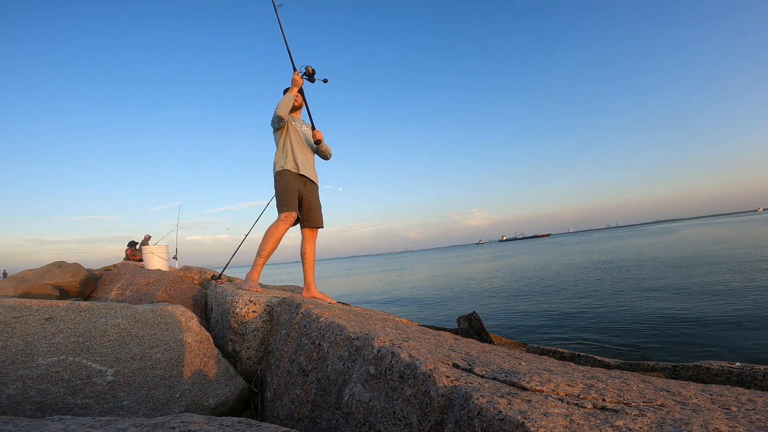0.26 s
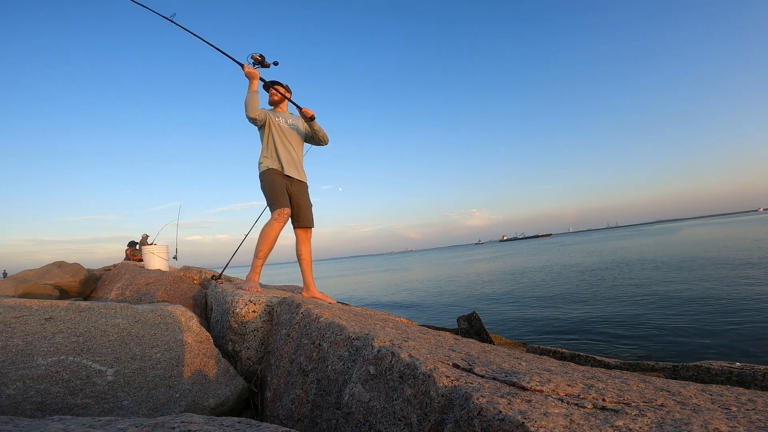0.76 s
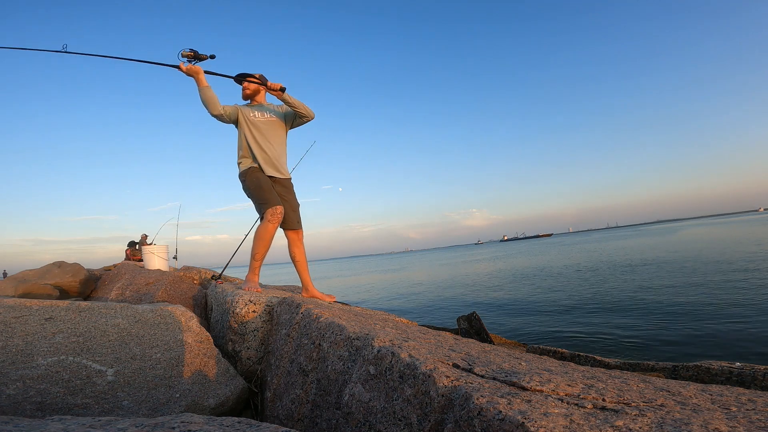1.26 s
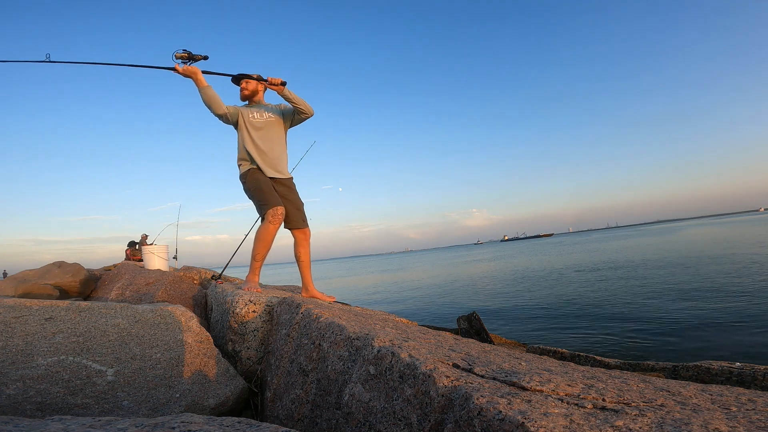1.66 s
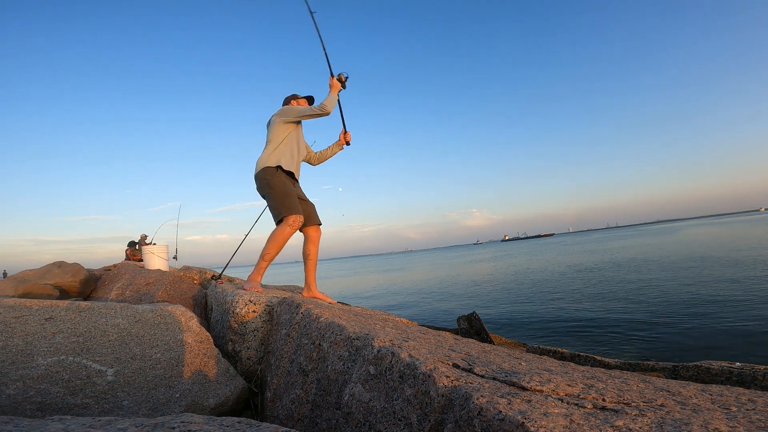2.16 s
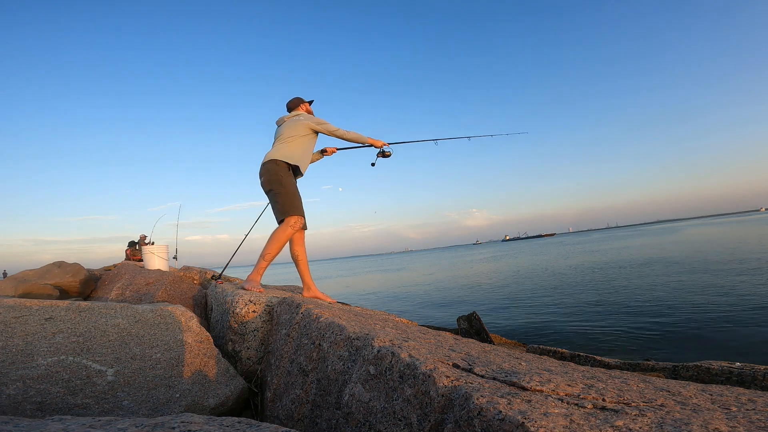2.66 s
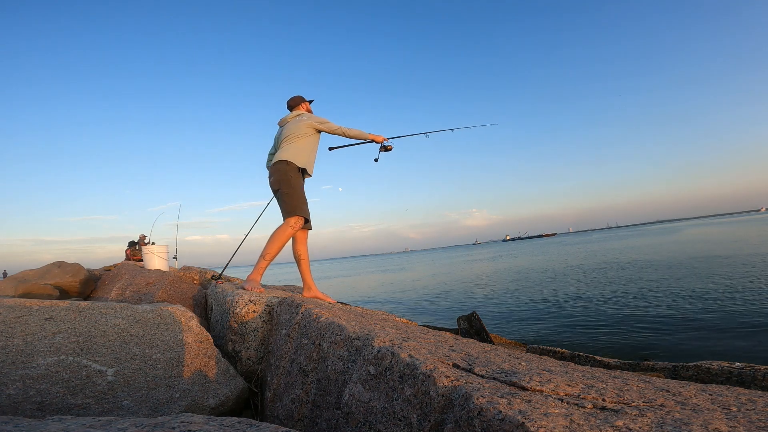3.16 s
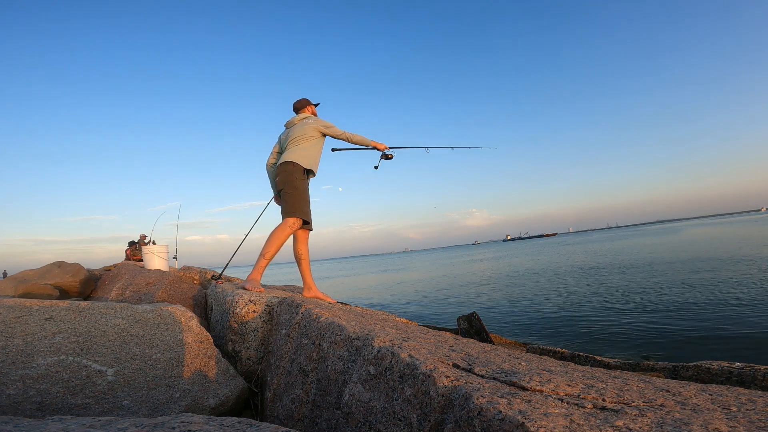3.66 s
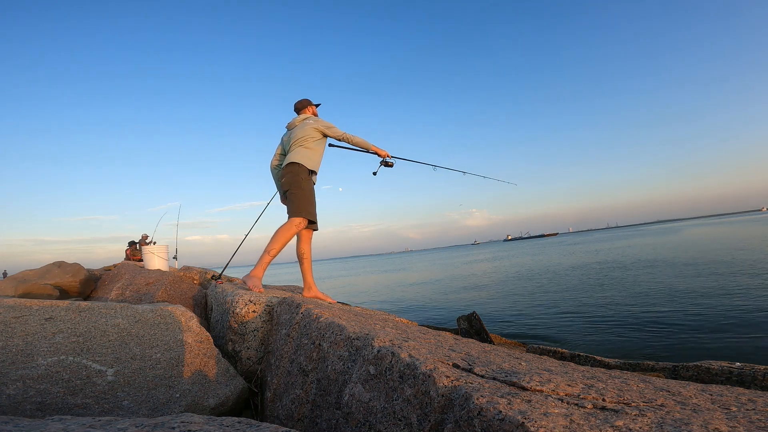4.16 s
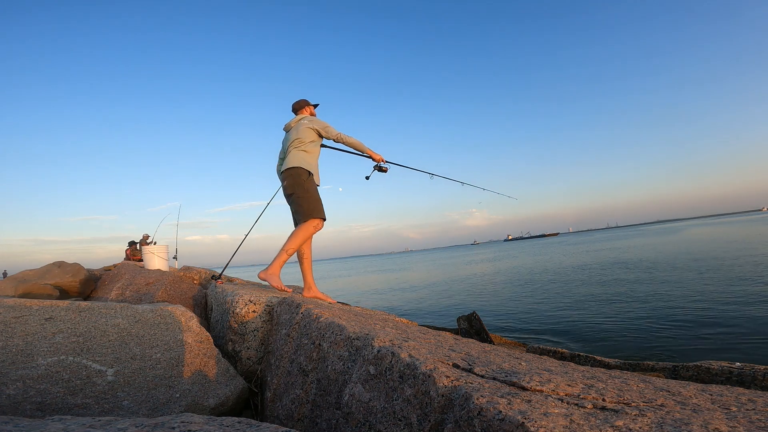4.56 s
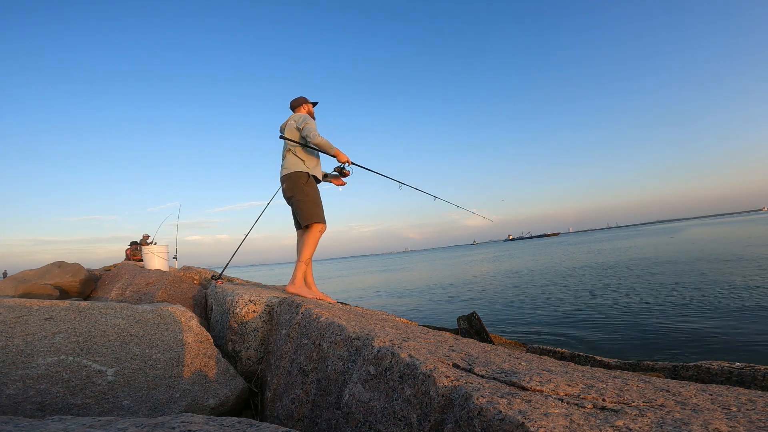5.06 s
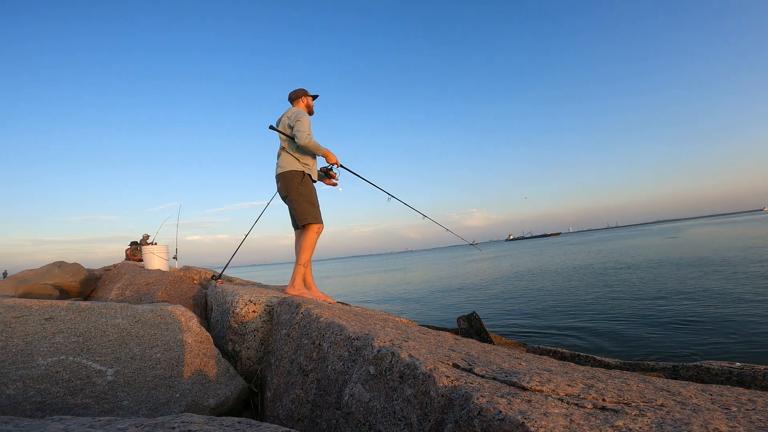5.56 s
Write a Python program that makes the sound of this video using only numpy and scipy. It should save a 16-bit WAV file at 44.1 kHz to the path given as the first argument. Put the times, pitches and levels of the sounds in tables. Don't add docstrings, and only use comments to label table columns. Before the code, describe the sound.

Outdoors by calm water, a quick whistling rod whoosh and hard clicks give way to thin, fading line hiss over deep droning.

```python
import sys
import numpy as np
from scipy import signal
from scipy.fft import rfft, irfft, next_fast_len
from scipy.io import wavfile
from scipy.ndimage import uniform_filter1d

SR = 44100
rng = np.random.default_rng(int(sys.argv[2]) if len(sys.argv) > 2 else 0)


def volts(x):
    e = np.asarray(x, float) / 20
    return 10 ** e


def dump(signal):
    limited = np.clip(np.atleast_2d(signal).T, -1, 1)
    pcm = np.round(limited * 32767).astype(np.int16)
    wavfile.write(sys.argv[1], SR, pcm)


N = 255780


def evened(x):
    return x / np.sqrt(np.mean(x ** 2) + 1e-20)


def read(points, hz):
    f, value = np.transpose(points)
    return np.interp(np.log(hz + 1), np.log(f + 1), value)


def play(rows):
    s, *columns = np.transpose(rows)
    t = np.arange(s[0], s[-1], 1 / SR)
    curves = [np.interp(t, s, column) for column in columns]
    return round(s[0] * SR), t, curves, signal.windows.tukey(len(t), 0.04)


def add(mix, at, sound, pan_db):
    part = mix[:, at:at + sound.shape[-1]]
    sides = volts(np.array([[pan_db / 2], [-pan_db / 2]]))
    part += (sound * sides)[:, :part.shape[1]]


def resonate(x, hz, width_hz):
    turn = np.exp(2j * np.pi * np.cumsum(hz * np.ones(len(x))) / SR)
    r = np.exp(-np.pi * width_hz / SR)
    low = x / turn + 1e-18
    for _ in range(2):
        low = signal.lfilter([1 - r], [1, -r], low)
    return evened((turn * low).real)


def flutter(length, ms, depth_db):
    size = max(int(ms * SR / 1000), 1)
    return volts(depth_db * evened(uniform_filter1d(rng.standard_normal(length), size)))


# t/s, air rush/dB, butt whoosh/dB, shaft whistle/dB, tip whistle/dB
ROD_SWEEP = [(2.26, -74.5, -57.5, -66, -75), (2.342, -54, -59, -73, -55.5), (2.392, -44.5, -47, -64.5, -63),
             (2.43, -31.5, -43, -40.5, -46), (2.444, -38.5, -44, -38, -32), (2.454, -45.5, -37, -38.5, -48),
             (2.502, -55.5, -57, -53, -60), (2.555, -48, -56, -53, -60)]
# f/Hz, density/dB per Hz
RUSH_SPECTRUM = [(290, -30.5), (500, -7.5), (833, -7), (982, -14.5), (1780, -23.5), (2180, -8.5),
                 (3000, -21), (6060, -22.5), (13500, -46)]
# t/s, butt f/Hz, shaft f/Hz, tip f/Hz
VORTEX_PITCH = [(2.27, 600, 2000, 3710), (2.33, 636, 2200, 4300), (2.38, 660, 2360, 5300),
                (2.42, 915, 2140, 6000), (2.46, 1095, 2490, 6000), (2.52, 1110, 2650, 6400),
                (2.58, 1100, 2620, 6400)]


def sweep():
    at, t, (rush_db, butt_db, shaft_db, tip_db), edge = play(ROD_SWEEP)
    s, *pitch = np.transpose(VORTEX_PITCH)
    butt_hz, shaft_hz, tip_hz = (np.interp(t, s, hz) for hz in pitch)
    n = len(t)
    air = rng.standard_normal((n, 5)).T
    stereo_air = air[0] + 0.55 * air[[3, 4]]
    colour = volts(read(RUSH_SPECTRUM, np.fft.rfftfreq(n, 1 / SR)))
    rush = evened(irfft(rfft(stereo_air) * colour, n))
    out = volts(rush_db + 1.5) * rush * flutter(n, ms=1.0, depth_db=1.5)
    out += volts(butt_db + 0.5) * resonate(air[1], butt_hz, 350)
    out += volts(shaft_db - 5.5) * resonate(air[2], shaft_hz, 280)
    out += volts(tip_db - 3.0) * resonate(air[3], tip_hz, 1500)
    return at, out * edge


def snap(modes):
    t = np.arange(2600) / SR
    contact = 0.3 * rng.standard_normal(len(t)) * volts(-60 * t / 0.0054)
    contact[4] += 1
    ring = sum(volts(db - 60 * t / t60_s) * np.sin(2 * np.pi * hz * t) for hz, db, t60_s in modes)
    swell = 1 - np.exp(-t / 0.0003)
    blow = signal.fftconvolve(contact, ring * swell)[:len(t)]
    return blow / abs(blow).max()


# t/s, peak/dB, left over right/dB
RELEASE_BLOWS = [
    (2.3141, -37.5, 0.96),
    (2.4146, -20, 0),
    (2.4166, -33, 1),
    (2.4308, -21.5, -0.14),
    (2.4322, -23, -0.48),
    (2.436, -30, 0),
    (2.4409, -20, .5),
    (2.4468, -37.5, 0),
]
# f/Hz, level/dB, t60/s
BLOW_MODES = [
    [(3800, -1, .016), (5660, -1, .01), (7020, -5, .008), (9860, -3, .006)],
    [(2310, -4.5, .02), (3960, 9.5, 0.011), (5300, -7, .008), (6400, 2.5, .01), (7800, -6, 0.011)],
    [(11660, -2.5, 0.008), (12550, -5, .008), (8060, -4, 0.0089)],
    [(2800, 3, 0.013), (3350, 8.5, 0.015), (4300, -6, 0.012), (7000, -10.5, .007)],
    [(2040, -0.5, .014), (2800, 7, 0.024), (4300, 7.5, 0.015)],
    [(3300, 0, 0.011), (5920, -2, .02)],
    [(6000, 8.5, 0.013), (6400, -7, .01), (3000, -6, .012)],
    [(6000, 0, .016), (2300, -2, .014)],
]


def release(tackle):
    for (s, db, pan_db), modes in zip(RELEASE_BLOWS, BLOW_MODES):
        add(tackle, round(s * SR), volts(db) * snap(modes), pan_db)


# t/s, hiss/dB, rim sizzle/dB, guide rattle/dB, first guide ring/dB
LINE_RUN = [(2.46, -48, -70, -53, -61), (2.48, -53.5, -58, -50.5, -67), (2.52, -57, -70, -67, -74),
            (2.54, -61, -64, -70, -71), (2.56, -57.5, -62, -51, -59), (2.63, -56.5, -65, -60, -72),
            (2.67, -55.5, -64, -55.5, -57), (2.73, -57.5, -61, -56.5, -65), (2.79, -59.5, -63, -54, -59),
            (2.82, -57, -63, -58, -70), (3.01, -60.5, -63, -60.5, -61), (3.13, -60, -68, -61.5, -74),
            (3.67, -61.5, -83, -64.5, -80), (3.98, -64.5, -88.5, -72, -88), (4.19, -65, -89.5, -63, -75),
            (4.25, -66, -88, -72, -85), (4.39, -64.5, -91.5, -67, -80), (4.49, -64, -90, -75, -82),
            (4.51, -63, -74, -64, -77), (4.6, -65.5, -92.5, -70, -79), (4.64, -65, -89, -58, -71),
            (4.68, -64, -91, -75, -77), (4.73, -65, -89, -67, -79), (4.78, -65, -87, -75, -90),
            (4.85, -65, -89.5, -70, -79), (4.88, -68, -91, -74, -82), (4.92, -62.5, -64.5, -58, -71),
            (4.93, -68.5, -79, -59, -72), (4.98, -74.5, -93, -73, -79)]
# t/s, f/Hz
HISS_PITCH = [(2.46, 6430), (3.0, 7070), (3.6, 7030), (4.2, 6000), (4.98, 5560)]
# f/Hz, width/Hz, level/dB
GUIDE_MODES = [(4293, 260, -3.5), (3300, 970, -7.5), (4020, 920, 2), (6344, 200, -9)]
# f/Hz, width/Hz, level/dB
RIM_MODES = [(11780, 1300, -2), (10800, 2700, 1.5), (12640, 1200, -10)]


def line():
    at, t, (hiss_db, rim_db, rattle_db, ring_db), edge = play(LINE_RUN)
    n = len(t)
    centre_hz = np.interp(t, *np.transpose(HISS_PITCH))
    air, chance = rng.standard_normal((n, 7)).T, rng.random((n, 3)).T
    slap_now = chance[0] < 300 / SR
    slaps = evened(slap_now * volts(-3.0 * np.log(chance[1] + 1e-3)) * np.sign(air[0]))
    drive = slaps + 1.5 * air[1]
    rattle = evened(sum(volts(db) * resonate(drive * flutter(n, 18, 4.5), hz, width_hz)
                        for hz, width_hz, db in GUIDE_MODES))
    ring = resonate(air[6] * flutter(n, 10.5, 6.5), 3680, 220)
    hiss = np.array([resonate(air[2] + 0.44 * air[k] + 0.3 * slaps, centre_hz, 3000) for k in (4, 5)])
    rim = np.array([sum(volts(db) * resonate(air[3] + 1.1 * air[k], hz, width_hz)
                        for hz, width_hz, db in RIM_MODES) for k in (4, 5)])
    out = volts(hiss_db - 0.9) * hiss * flutter(n, 30.0, 0.7)
    out += volts(rattle_db - 3.5) * rattle
    out += volts(ring_db - 1.0) * ring
    out += volts(rim_db - 0.3) * evened(rim) * flutter(n, 4.0, 1.4) * flutter(n, 40, 1.3)
    return at, out * edge


def tick(hz, bright_db):
    t = np.arange(500) / SR
    air = rng.standard_normal((2, len(t)))
    body = resonate(air[0], hz, 1500) * volts(-60 * t / 0.009)
    crack = resonate(air[1], 6300, 2400) * volts(bright_db + 5 - 60 * t / 0.0066)
    hit = (body + crack) * (1 - np.exp(-t / 0.0003))
    return hit / abs(hit).max()


# t/s, peak/dB, f/Hz, bright share/dB, left over right/dB
TACKLE_TICKS = [(0.0882, -50.5, 2650, -8, -4), (0.1244, -59.5, 2680, -16, -5),
                (1.1623, -60, 2780, -10.5, 3), (1.28, -55, 2850, -10, 0.0), (1.6721, -45, 2870, -8, 4.5),
                (2.5546, -37, 3090, -16, -4), (2.5704, -39.5, 3628, -12, -0.5),
                (2.5885, -40, 4320, -14, -7), (2.6124, -42, 2610, -10, -2), (2.6514, -42, 3580, -15, 0.0),
                (2.6683, -43, 2600, -20, 3.5), (2.6689, -40, 2600, -18, -0.5),
                (2.6744, -41.5, 3320, -15, -0.5), (2.6814, -40.5, 3680, -15, -5),
                (2.7094, -46, 2640, -9, 0.0), (2.928, -50.5, 4410, -12.5, 0.0),
                (2.9444, -44, 4370, -19, 0.5), (3.0094, -49, 3598, -15, -4), (3.0614, -46, 3420, -12, 0.5),
                (3.084, -45, 4240, -9, 0.0), (3.2094, -54, 2690, -10, -0.5), (3.3594, -46, 2740, -11, -1),
                (3.4344, -43, 2780, -14, -0.5), (3.4544, -42.5, 4260, -10, -0.5),
                (3.488, -51, 2650, -11, -6), (3.5466, -49, 2840, -9, -6), (3.5754, -41, 3000, -10, -2),
                (3.5813, -44, 2780, -10, -9), (3.6394, -49, 5110, -12, -6.5), (3.7344, -47, 4264, -15, 2),
                (4.0594, -53, 2840, -9, -2.0), (4.1194, -51, 2630, -14, -1.0),
                (4.1884, -48, 2700, -12.5, -1.5), (4.3844, -48.5, 4430, -9, 1),
                (4.5002, -54, 4299, -12, -1.0), (4.5644, -48, 3430, -14, -2.0),
                (4.6409, -46.5, 2710, -16, 0), (4.6633, -49, 4990, -13, -4), (4.7074, -53, 2780, -10, -2),
                (4.7277, -52, 4307, -14, -1.5), (4.7844, -56, 2820, -7, -1.5),
                (4.8958, -49, 4980, -5.5, -2), (4.9137, -43.5, 4300, -16, -9),
                (5.6794, -55, 2800, -21, -5.5)]


def ticks(tackle):
    for s, db, hz, bright_db, pan_db in TACKLE_TICKS:
        add(tackle, round(s * SR), volts(db) * tick(hz, bright_db), pan_db)


# f/Hz, left lead/rad
ANGLER_LEAD = [(0, 0), (3010, -0.64), (5340, -0.27), (6800, -0.1), (8440, -0.8), (9730, 0.0), (13200, 0.0)]


def near_ports(x):
    size = next_fast_len(N)
    lead = read(ANGLER_LEAD, np.fft.rfftfreq(size, 1 / SR))
    turn = np.exp(0.5j * np.outer([1, -1], lead))
    return irfft(rfft(x, size) * turn, size)[:, :N]


def stone(tackle):
    scatter = rng.standard_normal((2, 1300)) * volts(-60 * np.arange(1300) / SR / 0.01)
    scatter[:, :60] = 0
    return signal.fftconvolve(tackle, scatter / np.linalg.norm(scatter[0]), axes=1)[:, :N]


def bird(length_s, start_hz, end_hz):
    n = round(length_s * SR)
    glide_hz = np.linspace(start_hz, end_hz, n)
    return resonate(rng.standard_normal(n), glide_hz, 140) * signal.windows.tukey(n, 0.6)


# t/s, length/s, start f/Hz, end f/Hz, level/dB
BIRD_NOTES = [
    (0, 0.16, 2020, 2000, -61),
    (.39, .05, 3500, 3500, -68),
    (.48, .04, 3450, 3450, -70),
    (1.24, .05, 3800, 3800, -74),
    (1.336, 0.025, 1450, 1327, -53),
    (1.577, 0.1, 2230, 2200, -61),
    (1.949, 0.047, 2600, 2600, -61.5),
    (5.67, 0.034, 4260, 4300, -76),
]


def birds(tackle):
    for s, length_s, start_hz, end_hz, db in BIRD_NOTES:
        add(tackle, round(s * SR), volts(db) * bird(length_s, start_hz, end_hz), -0.4)


# t/s, lowest f/Hz, lowest/dB, second/dB, fourth order/dB
ENGINE_THROB = [(0.0, 62.52, -26.5, -27, -29), (0.11, 70.69, -18.5, -26, -37),
                (0.32, 70.45, -24.5, -24, -37), (0.4, 71.0, -20, -40, -48), (0.52, 73.78, -38, -28.5, -40),
                (0.63, 71.9, -16.5, -25, -35), (0.71, 69.9, -26, -38.5, -36),
                (0.89, 71.92, -19.5, -23.5, -33), (0.93, 70.9, -17, -26.5, -42),
                (1.06, 75.21, -29.5, -32.5, -32.5), (1.13, 72.8, -28, -22, -39),
                (1.19, 70.27, -21, -38, -46), (1.24, 69.8, -28, -27, -33.5), (1.4, 70.46, -21, -27, -45),
                (1.5, 74.7, -27, -30.5, -51), (1.65, 70.76, -24.5, -23, -32.5),
                (1.82, 71.08, -23, -37.5, -51), (1.86, 70.86, -23, -36.5, -33.5),
                (2.0, 68.44, -26.5, -21, -43.5), (2.05, 70.4, -25.5, -24, -50), (2.13, 70, -24, -47, -37),
                (2.23, 69.43, -20, -22.5, -40.5), (2.39, 68.89, -35, -29.5, -47),
                (2.45, 69.33, -24, -34, -39), (2.52, 68.98, -39, -41, -43), (2.57, 69.21, -25, -21, -34.5),
                (2.65, 69.4, -26, -38, -42), (2.7, 69.8, -26, -22.5, -36), (2.81, 69.5, -22, -30, -45),
                (2.86, 68.9, -38, -19.5, -59), (2.97, 70.4, -31, -35, -33),
                (3.13, 70.45, -24.5, -17, -39.5), (3.25, 71.04, -20.5, -43, -53),
                (3.31, 70.52, -25, -25.5, -34), (3.55, 64.2, -28.5, -27.5, -35),
                (3.62, 68.3, -19, -38, -35), (3.68, 69.5, -17.5, -20, -42), (3.93, 69.5, -37, -31, -36),
                (4.15, 69.44, -22.5, -22.5, -40), (4.22, 69.4, -18.5, -38, -48),
                (4.31, 69.66, -24.5, -26, -38.5), (4.57, 70.5, -24.5, -23.5, -37),
                (4.64, 70.64, -17, -28, -33.5), (4.72, 71.1, -25.5, -31, -39),
                (4.86, 71.1, -21.5, -22.5, -50), (4.93, 75.66, -44, -30, -50), (4.97, 73.3, -24, -33, -53),
                (5.06, 71.97, -24, -28.5, -46.5), (5.25, 71.85, -22, -27.5, -38),
                (5.3, 72.7, -20, -35, -45), (5.38, 74.5, -32, -21.5, -33), (5.54, 70.5, -21, -34, -41),
                (5.59, 69.8, -33.5, -29, -37.5), (5.67, 68.3, -17.5, -25.5, -35.5),
                (5.74, 69.2, -19.5, -39, -44), (5.8, 71.2, -30, -33, -38)]
# f/Hz, level/dB
AUX_MOTOR = (362.5, -48)


def throb():
    at, t, (low_hz, low_db, second_db, fourth_db), edge = play(ENGINE_THROB)
    motor_hz, motor_db = AUX_MOTOR
    drift = evened(uniform_filter1d(rng.standard_normal((len(t), 4)), 3500, 0)).T
    steady = np.ones(len(t))
    pitch_hz = np.array([low_hz, 88 * steady, 176 * steady, motor_hz * steady])
    pitch_hz *= 1 + np.array([[0.05], [0.05], [0.03], [0.004]]) * drift
    level_db = np.array([low_db - 1.0, second_db - 1.0, fourth_db - 1.2, motor_db + 1.2 * drift[0]])
    phase = 2 * np.pi * np.cumsum(pitch_hz, axis=1) / SR + 0.76
    tones = np.sqrt(2) * (volts(level_db) * np.sin(phase)).sum(0)
    return np.pad(tones, (at, N))[:N]


# f/Hz, width/Hz, level/dB
ENGINE_DRONE = [(115.7, 7, -34), (134.25, 8, -36), (176.1, 15, -44), (252.9, 25, -44.5), (360.8, 8, -51.5),
                (455, 5, -56.5)]


def drone():
    return sum(volts(db) * resonate(rng.standard_normal(N + SR), hz, width_hz)[SR:]
               for hz, width_hz, db in ENGINE_DRONE)


# f/Hz, share/1
PORT_LIKENESS = [(60, 1.0), (130, 1.0), (280, 1), (600, 1), (1300, 0.86), (2800, 0.44), (6040, 0.52),
                 (13000, 0.69)]
# f/Hz, level/dB
PORT_LEAN = [(60, 0), (150, -.1), (300, -1.1), (500, -1.4), (1200, -1), (2500, -.3), (5000, .2),
             (10000, .5)]
# f/Hz, phase/rad
PORT_LEAD = [(40, 0.088), (200, -.03), (600, -0.27), (1500, -0.22), (2400, 0.0072), (3000, -1.1),
             (5600, 0.19), (13000, 0)]


def ports(shape_db, size):
    hz = np.fft.rfftfreq(size, 1 / SR)
    a, b, c, d = rng.standard_normal((shape_db.shape[1], len(hz), 4)).T
    same = np.clip(read(PORT_LIKENESS, hz), 0, 1)[:, None]
    left = a + 1j * b
    right = same * left + np.sqrt(1 - same ** 2) * (c + 1j * d)
    right = right * np.exp(-1j * read(PORT_LEAD, hz))[:, None]
    lean = volts(read(PORT_LEAN, hz) / 2)[:, None]
    z = np.array([left * lean, right / lean]) * volts(shape_db)
    return evened(signal.istft(z, nperseg=size, noverlap=size * 3 // 4)[1][:, :N])


# f/Hz, density/dB per Hz
WASH_SPECTRUM = [(20, -28), (45, -17), (75, -3.5), (150, -24), (300, -28), (600, -34.5), (900, -43),
                 (1500, -49), (2500, -57), (3300, -65.5), (4800, -69), (7000, -80), (8500, -88),
                 (10000, -94.5), (15000, -104)]
# t/s, mid/dB, treble/dB
LAPPING = [(0.0, -45, -71), (0.35, -47.5, -71.5), (0.82, -47.5, -71.5), (1.13, -48.5, -72),
           (1.5, -47.5, -73.5), (2.26, -46, -71.5), (2.36, -46.5, -63), (2.49, -50.5, -56),
           (2.58, -47, -56), (2.68, -46, -57), (3.15, -46.5, -61), (3.49, -44, -63), (3.75, -46, -64),
           (4.09, -46.5, -64), (4.54, -46, -63), (4.78, -47, -64), (4.99, -44, -68), (5.23, -44.5, -66.5),
           (5.8, -45, -72.5)]


def wash():
    s, mid_db, high_db = np.transpose(LAPPING)
    hz = np.fft.rfftfreq(2048, 1 / SR)
    t = np.arange(N // 512 + 6) * 512 / SR
    grain = uniform_filter1d(rng.standard_normal((len(t), len(hz))), 20, 1)
    patches = evened(uniform_filter1d(grain, 5, 0)).T
    mid_share = np.exp(-(np.log((hz + 1) / 1000) / 0.84) ** 2)[:, None]
    high_share = 1 / (1 + (3000 / (hz + 1)) ** 4)[:, None]
    spray_share = 1 / (1 + (8000 / (hz + 1)) ** 6)[:, None]
    laps_db = mid_share * (np.interp(t, s, mid_db) + 46.5)
    laps_db += high_share * np.clip(np.interp(t, s, high_db) + 73.5, -4, 4)
    laps_db += 5.5 * evened(uniform_filter1d(rng.standard_normal(len(t)), 3)) * spray_share
    laps_db += 1.3 * patches * (mid_share + high_share)
    return volts(-27) * ports(read(WASH_SPECTRUM, hz)[:, None] + laps_db, size=2048)


def scene():
    tackle = np.zeros((2, N))
    add(tackle, *sweep(), 0.1)
    release(tackle)
    add(tackle, *line(), 0.3)
    ticks(tackle)
    birds(tackle)
    harbour = wash() + drone() + throb()
    return near_ports(tackle) + volts(-15) * stone(tackle) + harbour


# f/Hz, level/dB
MIC_RESPONSE = [(100, 0), (12500, 0), (13500, -6), (14500, -14.5), (16000, -30), (22000, -52)]


def microphone(x):
    size = next_fast_len(N + 2000)
    response = volts(read(MIC_RESPONSE, np.fft.rfftfreq(size, 1 / SR)))
    return irfft(rfft(x, size) * response, size)[:, :N]


def top_cut(x):
    return signal.sosfilt(signal.butter(12, 15600, fs=SR, output="sos"), x)


def record(dry):
    heard = microphone(dry)
    heard *= np.clip(0.4 + np.arange(N) / 300, 0, 1)
    return top_cut(heard)


dry = scene()
out = record(dry)
dump(out)
```